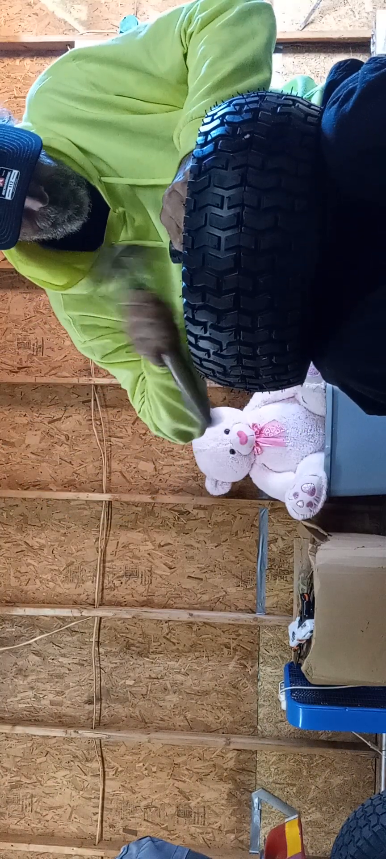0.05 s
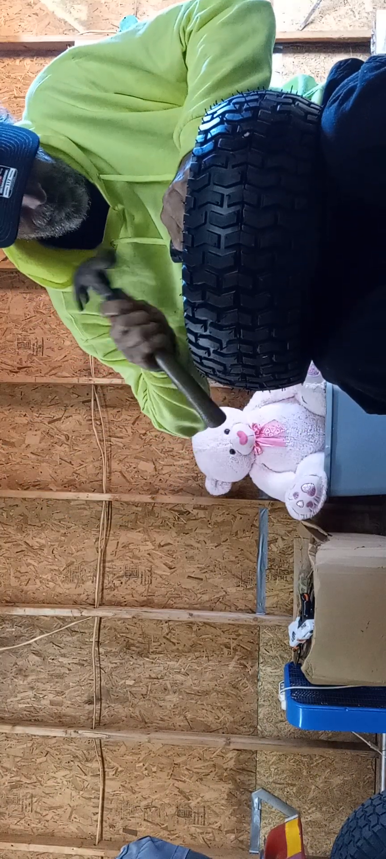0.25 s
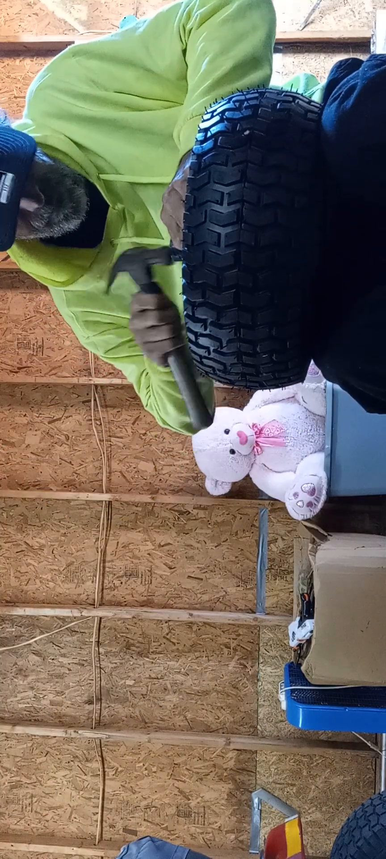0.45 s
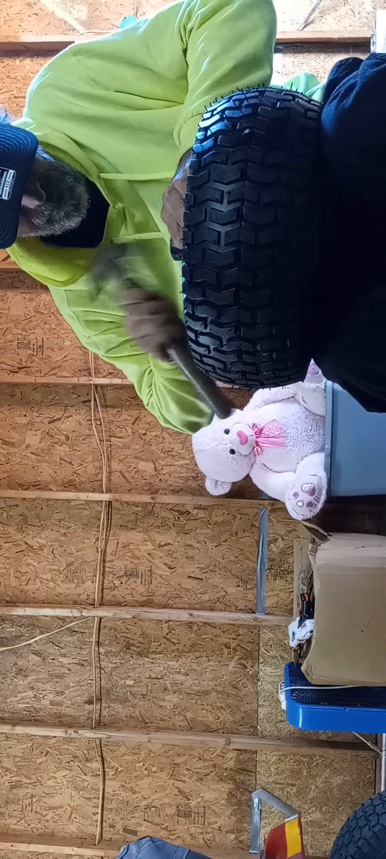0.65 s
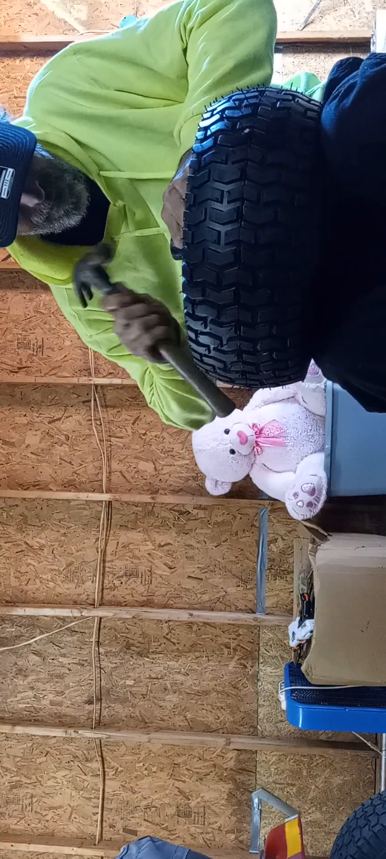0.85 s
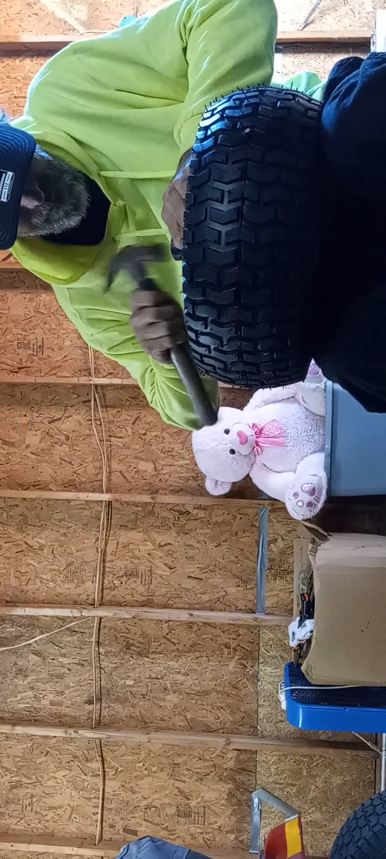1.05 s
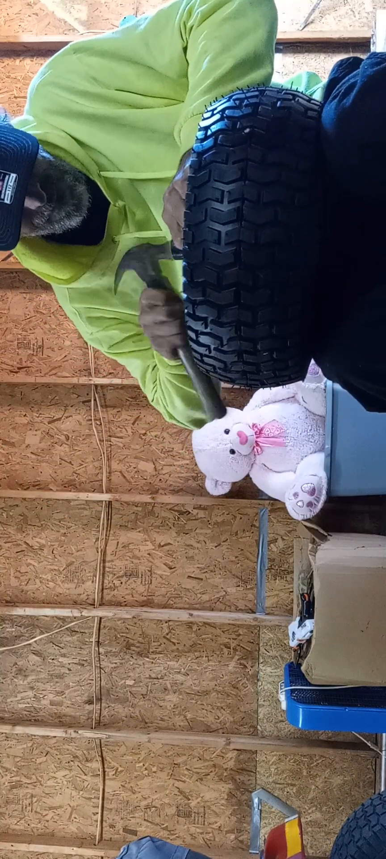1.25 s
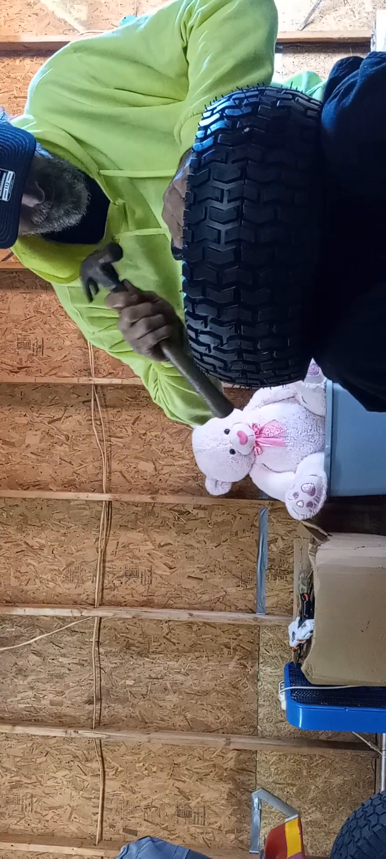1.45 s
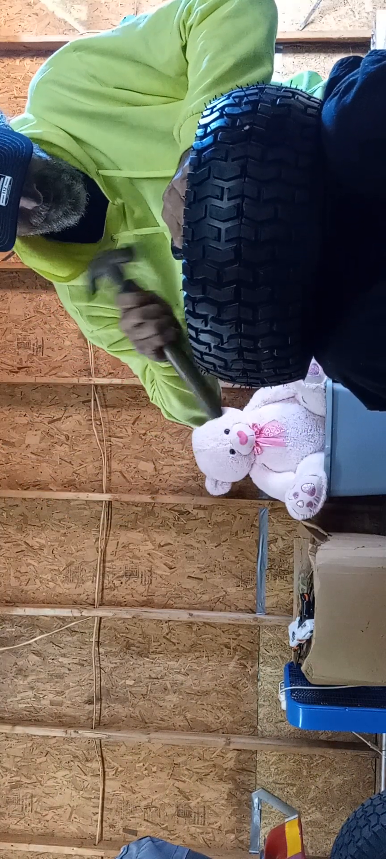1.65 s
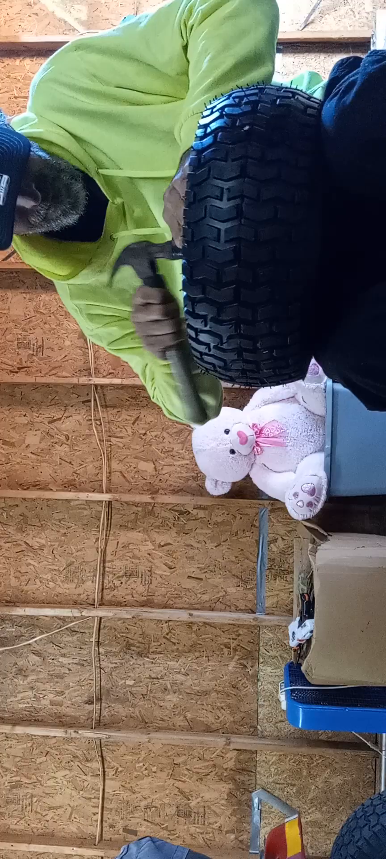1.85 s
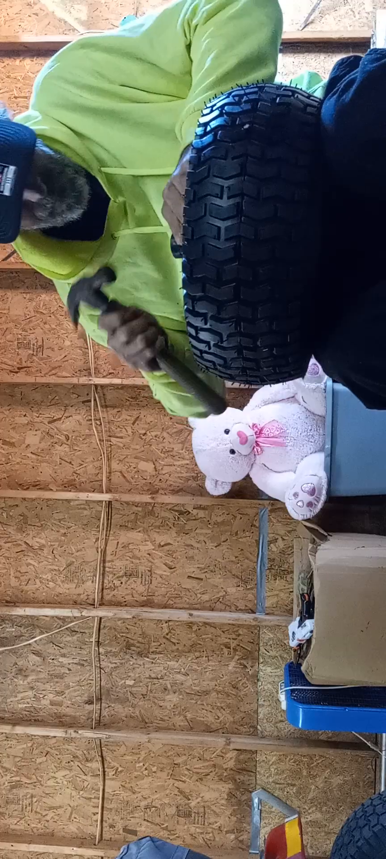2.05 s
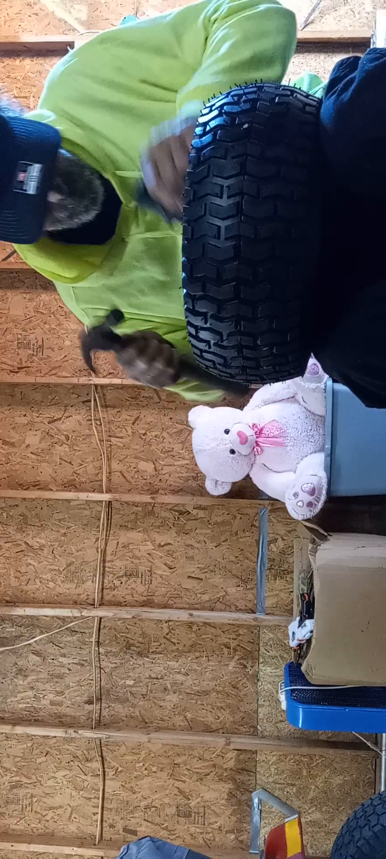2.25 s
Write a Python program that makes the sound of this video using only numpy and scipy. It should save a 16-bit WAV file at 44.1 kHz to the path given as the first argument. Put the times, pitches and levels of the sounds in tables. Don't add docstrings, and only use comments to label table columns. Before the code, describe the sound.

Hammer blows on steel crack sharply, each with a short ring and hollow wheel thump

```python
import sys
import numpy as np
from scipy import signal
from scipy.fft import rfft, irfft, next_fast_len
from scipy.io import wavfile
from scipy.ndimage import uniform_filter1d, minimum_filter1d

SR = 44100
rng = np.random.default_rng(int(sys.argv[2]) if len(sys.argv) > 2 else 0)


def file_out(sig):
    cols = np.atleast_2d(sig).T
    lim = np.clip(cols, -1, 1)
    pcm = np.round(lim * 32767).astype(np.int16)
    wavfile.write(sys.argv[1], SR, pcm)


def volts_from_decibels(level):
    exponent = np.asarray(level, float) / 20
    return 10 ** exponent


N = 101429
RUN_IN = SR // 4

# (time [s], strength [dB], drift ring [dB], hammer ring [dB], top rings [dB])
BLOWS = [
    (.2065, -3.5, 2.5, 0, 6),
    (.5307, -3.5, 0, 4, 4),
    (.8198, -4, 3.5, -6, 5),
    (1.1043, -2, 2.5, 2, 2.5),
    (1.39, -2.5, 2, 0, 4.5),
    (1.6608, -3.5, 4.5, -2, 4),
    (1.9356, -4, 2.5, 1, 7),
]
# (frequency [Hz], level [dB], T60 [s])
DRIFT_MODES = [(4420, -10.5, 0.0084), (4560, -19.5, 0.049), (4590, -6.5, 0.0095), (4720, -13.5, 0.018)]
# (frequency [Hz], level [dB], T60 [s])
HAMMER_MODES = [(5350, -18, .005), (5640, -26, .1), (5950, -16, .007)]
# (frequency [Hz], level [dB], T60 [s])
TOP_MODES = [(6610, -10, 0.0034), (8800, -12.5, 0.0061), (8817, -26.5, 0.03), (11180, -31.5, 0.0048),
             (12900, -28, 0.0029)]
SOCKET_MODE = (15150, -14, 0.01)  # (frequency [Hz], level [dB], T60 [s])
# (frequency [Hz], level [dB], T60 [s])
WHEEL_MODES = [(153.1, -20, 0.058), (356, -23.5, 0.026), (446.4, -8.5, 0.021), (594, -5, 0.013),
               (729.4, -3, 0.011)]
# (frequency [Hz], level [dB], T60 [s])
RIM_MODES = [(1188, -21.5, 0.03), (1282, -16, 0.0069), (1578, -9, 0.012), (2189, -14.5, 0.009),
             (2820, -10, 0.0041), (3563, -12.5, 0.0031)]
# (time [s], level [dB])
PATS = [
    (2.212, -39),
    (2.22, -33.5),
    (2.231, -37.5),
    (2.239, -45),
]
# (frequency [Hz], level [dB], T60 [s])
TYRE_MODES = [(415, -19, 0.072), (565, -6, 0.092), (677, -8, 0.02), (1090, -9.5, 0.015), (1610, -7.5, .04)]
# (frequency [Hz], T60 [s])
GARAGE_T60 = [(100, 1), (260, 0.5543), (700, 0.4545), (1840, 0.4168), (4850, 0.34), (8000, 0.2581),
              (12800, 0.2264)]
# (frequency [Hz], level [dB])
GARAGE_DB = [(90, -58), (180, -34), (500, -34.5), (1000, -32), (2000, -28), (3500, -33), (6000, -31),
             (14000, -35.5)]
# (frequency [Hz], correlation [-1..1])
LIKENESS = [(100, 1), (300, 0.9), (1000, -0.46), (3000, -0.6), (6000, 0.26), (12000, 0.021)]
# (frequency [Hz], level [dB])
BALANCE_DB = [(60, 4.5), (180, 0), (550, 3), (1650, 2), (4970, 2), (15000, -7.5)]
# (frequency [Hz], level [dB], T60 [s])
STANDING_WAVES = [(220.5, -66.5, 0.48), (308.2, -54, 0.47), (342.8, -54, 0.34), (397.2, -48.5, 0.27),
                  (413.8, -65.5, 0.38), (427.6, -57.5, 0.51), (456.6, -51, 0.25), (497.4, -53, 0.16),
                  (506, -57, 0.52), (618.5, -61, 0.63), (632.3, -53.5, 0.5), (680, -54, 0.47),
                  (694, -65, 0.9), (824, -51.5, 0.1)]
# (delay [s], left [dB], right [dB])
ECHOES = [
    (.0016, -6, -9),
    (.0048, -12, -12),
]
# (time [s], level [dB])
JOLTS = [
    (.21, -40.5),
    (1.393, -38),
    (1.664, -40),
    (1.94, -38.5),
]


def blows():
    earlier_blow = (-.14, -8.5, 0, 0, 0)
    s, db, drift_db, hammer_db, top_db = np.transpose([earlier_blow] + list(BLOWS))
    return steel(s, db, drift_db, hammer_db, top_db) + wheel(s, db) + cracks(s, db)


def steel(s, db, drift_db, hammer_db, top_db):
    drift = strike(s, db + drift_db, DRIFT_MODES)
    hammer = strike(s, db + hammer_db, HAMMER_MODES)
    top = strike(s, db + top_db, list(TOP_MODES) + [SOCKET_MODE])
    return drift + hammer - top


def wheel(s, db):
    wheel_lag_s, rim_lag_s, contact_hz = 0.00178, 0.00063, 3500
    thump = soften(strike(s + wheel_lag_s, db, WHEEL_MODES, turn=0.96), contact_hz)
    return thump + strike(s + rim_lag_s, db, RIM_MODES)


def cracks(s, db):
    tick_db, tick_s = -3, .00022
    crack_db, grit_db, grit_t60_s = -4, -17, 0.0033
    out = np.zeros(RUN_IN + N)
    fade = volts_from_decibels(-60 * np.arange(400) / SR / grit_t60_s)
    tick = np.hanning(int(tick_s * SR) + 2)
    for i, blow_db in zip(RUN_IN + np.round(s * SR).astype(int), db):
        grit = fade * rng.standard_normal(len(fade))
        out[i:i + len(fade)] += volts_from_decibels(blow_db) * (volts_from_decibels(crack_db) * scattered_click() + volts_from_decibels(grit_db) * grit)
        out[i - len(tick):i] += volts_from_decibels(blow_db + tick_db) * tick
    return out


def scattered_click():
    scatter = 0.7
    x = np.zeros(400)
    x[0] = 1
    for lag in (3, 5, 11, 17, 29):
        a = np.zeros(lag + 1)
        a[[0, -1]] = 1, scatter
        x = signal.lfilter(a[::-1], a, x)
    return np.diff(x, prepend=0) * .5 + .5 * x


def strike(s, db, modes, turn=-1):
    spread_db = 1
    out = np.zeros(RUN_IN + N)
    luck = rng.standard_normal((len(s), len(modes)))
    for k, (hz, mode_db, t60) in enumerate(modes):
        clicks = np.zeros(RUN_IN + N)
        clicks[RUN_IN + np.round(s * SR).astype(int)] = volts_from_decibels(db + mode_db + spread_db * luck[:, k])
        out += turn ** k * ring(clicks, hz, t60)
    return out


def ring(clicks, hz, t60):
    r = volts_from_decibels(-60 / (t60 * SR))
    w = 2 * np.pi * hz / SR
    return signal.lfilter([0, np.sin(w)], [1, -2 * r * np.cos(w), r * r], clicks + 1e-18)


def soften(x, hz):
    r = np.exp(-2 * np.pi * hz / SR)
    return signal.lfilter([(1 - r) ** 2], [1, -2 * r, r * r], x)


def pats():
    s, db = np.transpose(PATS)
    return soften(strike(s, db, TYRE_MODES), 1220)


def garage(x):
    build_s, right_lag_s = 0.0013, 0.0001292
    t = np.arange(SR // 2) / SR
    answer = garage_tail(t) + standing_waves(t)
    answer *= 1 - np.exp(-(t / build_s) ** 2)
    answer[:, 0] += 1
    for s, left_db, right_db in ECHOES:
        answer[:, int(s * SR)] += volts_from_decibels(np.array([left_db, right_db]))
    size = next_fast_len(len(x) + len(t))
    hz = np.fft.rfftfreq(size, 1 / SR) + 1
    balance = volts_from_decibels(at_hz(BALANCE_DB, hz) * [[.5], [-.5]])
    lag = np.exp(-2j * np.pi * hz * right_lag_s * [[0], [1]])
    return irfft(rfft(x, size) * rfft(answer, size) * balance * lag, size)[:, RUN_IN:RUN_IN + N]


def garage_tail(t):
    tail = np.zeros((2, len(t)))
    edges = 60 * 2 ** np.arange(0, 8.3, 1 / 3)
    white = rng.standard_normal((2, 2, len(t)))
    for k, (low, high) in enumerate(zip(edges, edges[1:])):
        band = signal.butter(2, [low, high], "band", fs=SR, output="sos")
        mid, side = signal.sosfilt(band, white[k % 2])
        hz = np.sqrt(low * high)
        alike = at_hz(LIKENESS, hz)
        fade = volts_from_decibels(at_hz(GARAGE_DB, hz) - 60 * t / at_hz(GARAGE_T60, hz))
        tail += fade * (np.sqrt(1 + alike) * mid + np.sqrt(1 - alike) * side * [[1], [-1]])
    return tail


def standing_waves(t):
    out = np.zeros(len(t))
    phases = rng.uniform(0, 2 * np.pi, len(STANDING_WAVES))
    for (hz, wave_db, t60), phase in zip(STANDING_WAVES, phases):
        out += volts_from_decibels(wave_db - 60 * t / t60) * np.sin(2 * np.pi * hz * t + phase)
    return out


def at_hz(points, hz):
    table_hz, value = np.transpose(points)
    return np.interp(np.log(hz), np.log(table_hz), value)


def air():
    return volts_from_decibels(-64) * 5 * soften(rng.standard_normal((2, N)), 500)


def ground():
    rumble_db, rumble_hz = -47, 40
    jolt_hz, jolt_t60_s = 35, .08
    s, db = np.transpose(JOLTS)
    rumble = volts_from_decibels(rumble_db) * soften(rng.standard_normal((2, RUN_IN + N)), rumble_hz)
    jolts = soften(strike(s, db, [(jolt_hz, 0, jolt_t60_s)]), 2 * jolt_hz)
    return (rumble + jolts)[:, RUN_IN:]


def scene():
    pat_room_db, pat_left_db, low_cut_hz = -9.5, 6, 162
    hand = pats()
    close_hand = volts_from_decibels(pat_left_db * np.array([[.5], [-.5]])) * hand[RUN_IN:]
    x = garage(blows() + volts_from_decibels(pat_room_db) * hand) + close_hand + air()
    return signal.sosfilt(signal.butter(4, low_cut_hz, "high", fs=SR, output="sos"), x) + ground()


def level_db(x, s):
    power = uniform_filter1d(np.mean(x ** 2, axis=0), int(s * SR))
    return 10 * np.log10(power + 1e-12)


def limiter_db(x):
    threshold_db, duck_share, listen_s = -26.5, 0.36, 0.0022
    ahead_s, release_db_per_s = 0.026, 32.5
    over = np.maximum(level_db(x, listen_s) - threshold_db, 0) * duck_share
    ramp = release_db_per_s * np.arange(N) / SR
    held = np.maximum.accumulate(over + ramp) - ramp
    n = int(ahead_s * SR)
    early = -minimum_filter1d(-held, n, origin=-(n // 2))
    return uniform_filter1d(early, n // 2, mode="nearest")


def band_limit(x):
    return signal.sosfilt(signal.butter(12, 16810, fs=SR, output="sos"), x)


def record(dry):
    makeup_db, fade_s, fade_db = 9, 0.049, -2.5
    gate_db, gate_share, gate_s = -30, 0.2, 0.09
    cutoff_hz = 16700
    closing = np.clip(1 - (N - np.arange(N)) / (fade_s * SR), 0, 1)
    x = dry * volts_from_decibels(makeup_db - limiter_db(dry) + fade_db * closing)
    gate = gate_share * np.minimum(level_db(x, gate_s) - gate_db, 0)
    x = np.clip(x * volts_from_decibels(gate), -1, 1)
    x = signal.sosfilt(signal.cheby2(8, 60, cutoff_hz, fs=SR, output="sos"), x)
    return band_limit(np.clip(x, -1, 1))


dry = scene()
out = record(dry)
file_out(out)
```